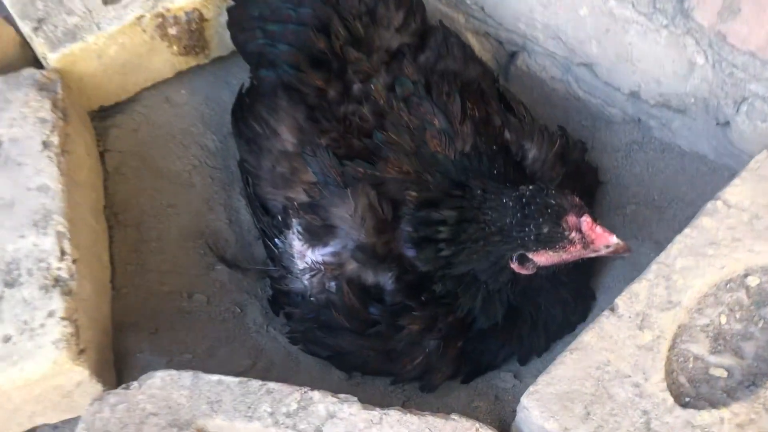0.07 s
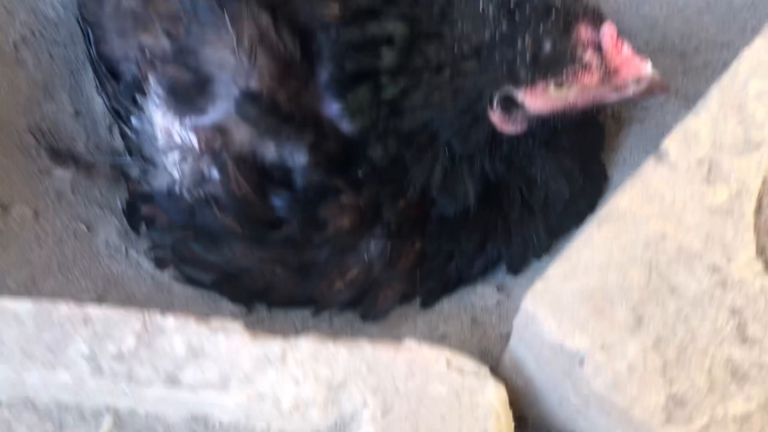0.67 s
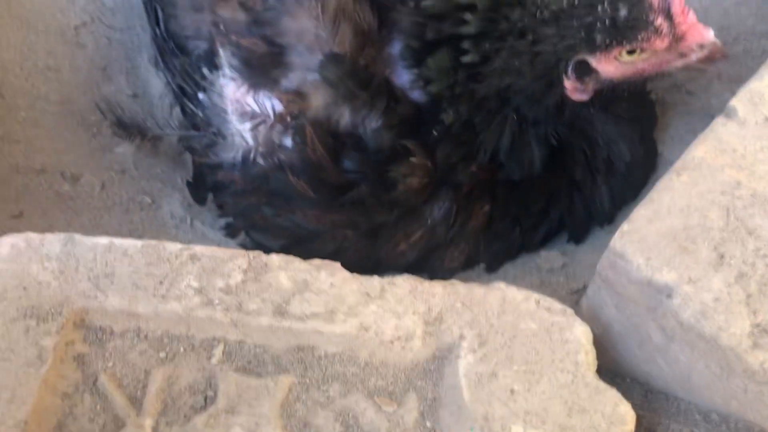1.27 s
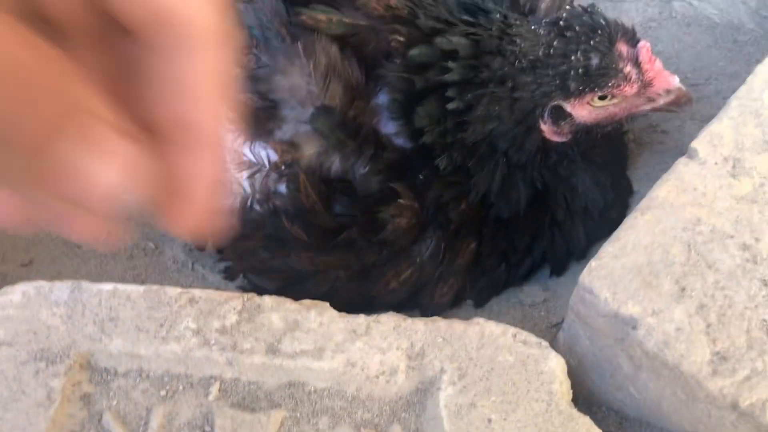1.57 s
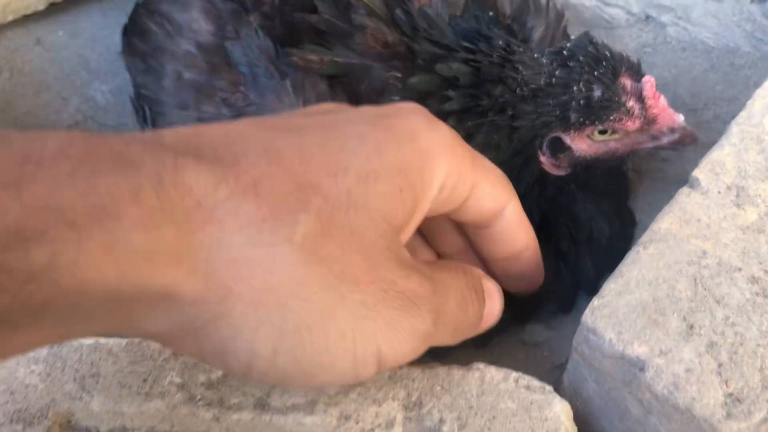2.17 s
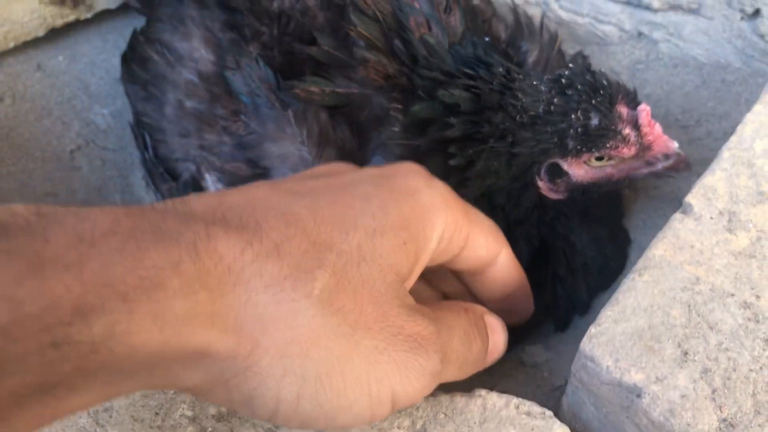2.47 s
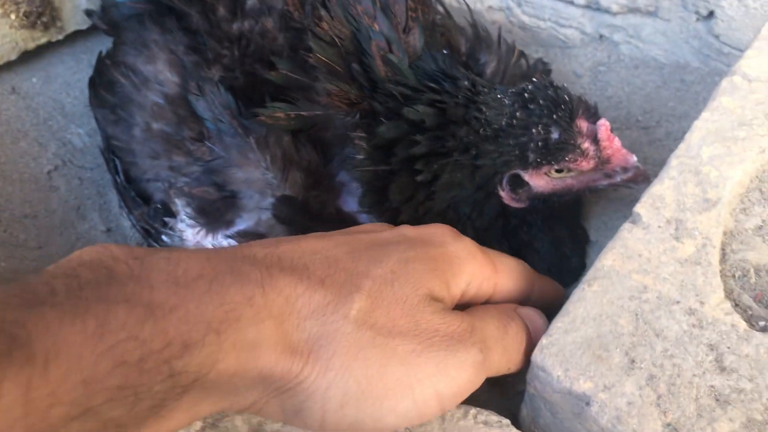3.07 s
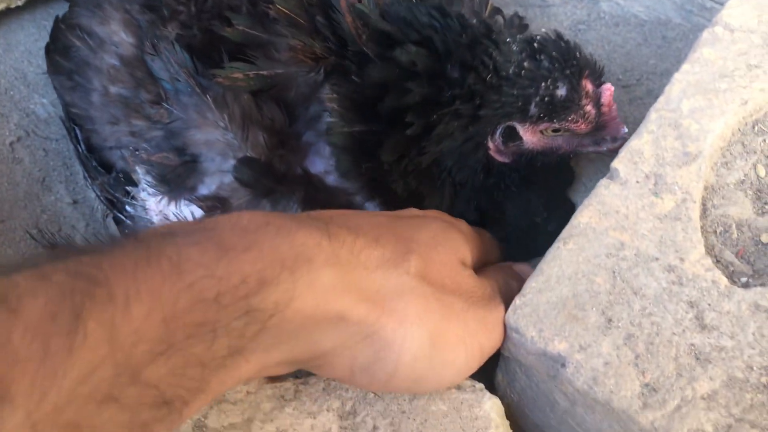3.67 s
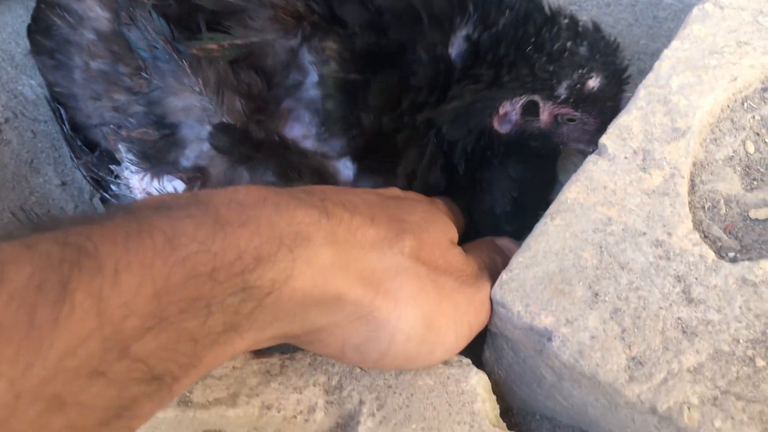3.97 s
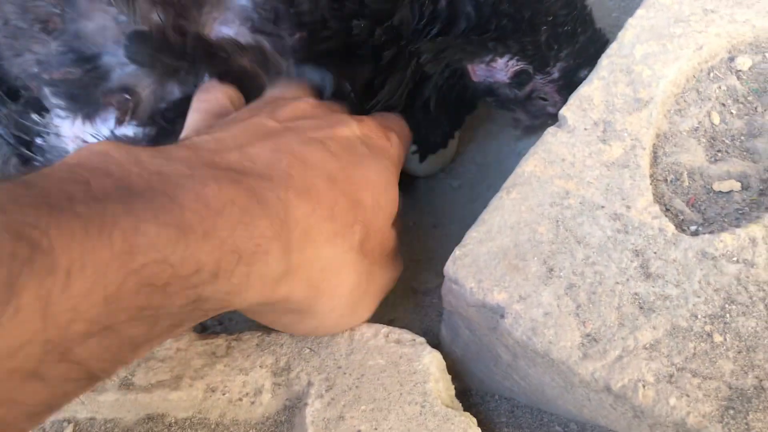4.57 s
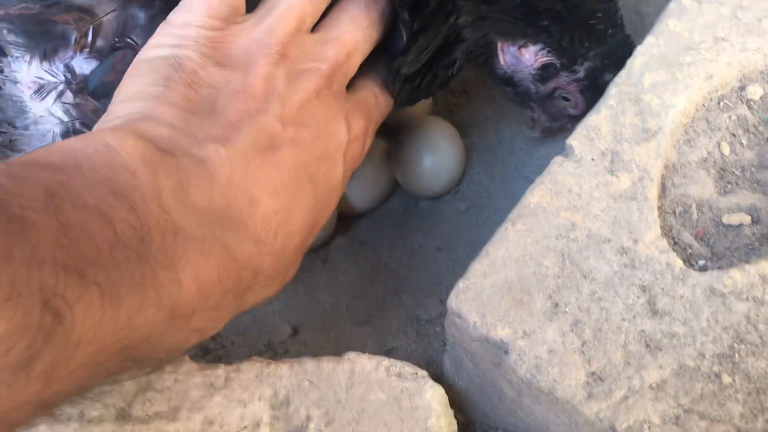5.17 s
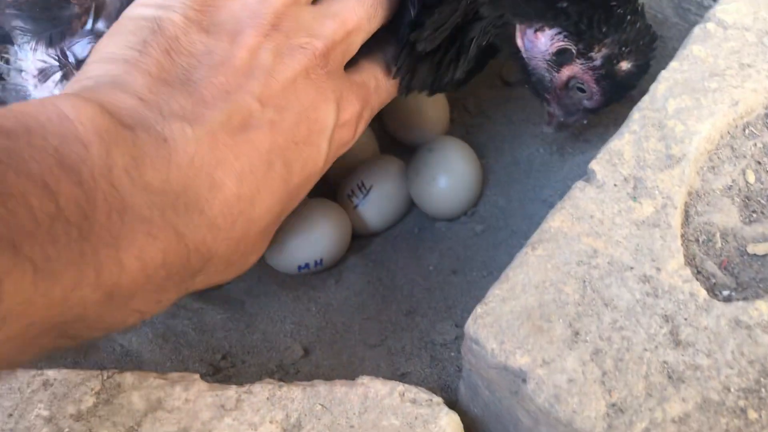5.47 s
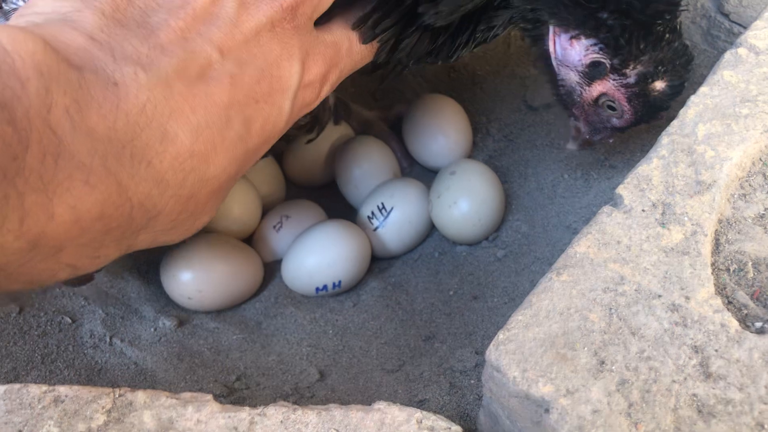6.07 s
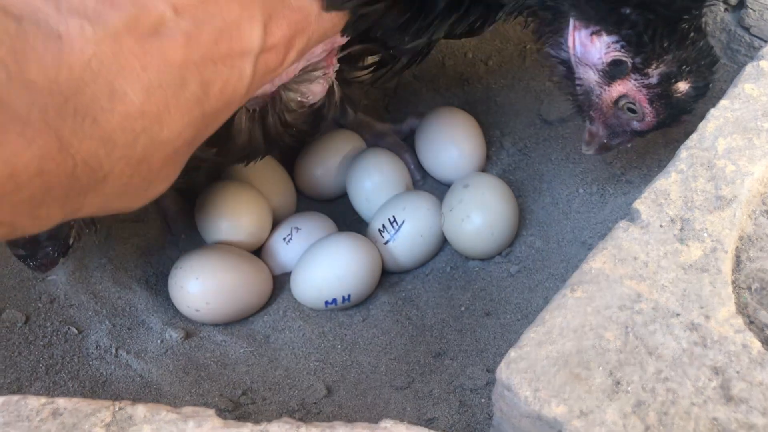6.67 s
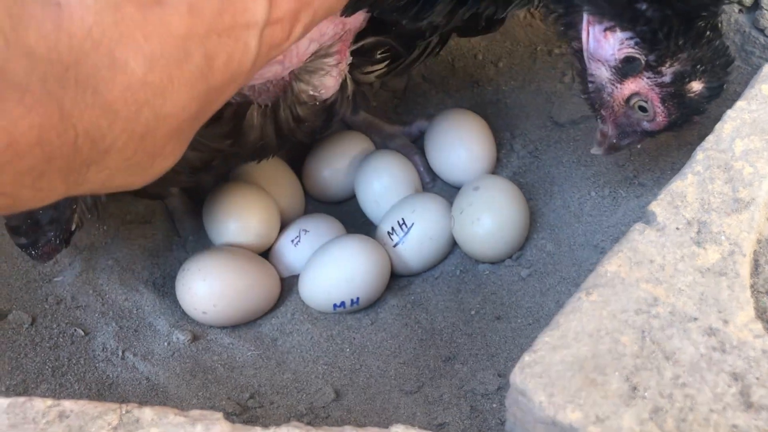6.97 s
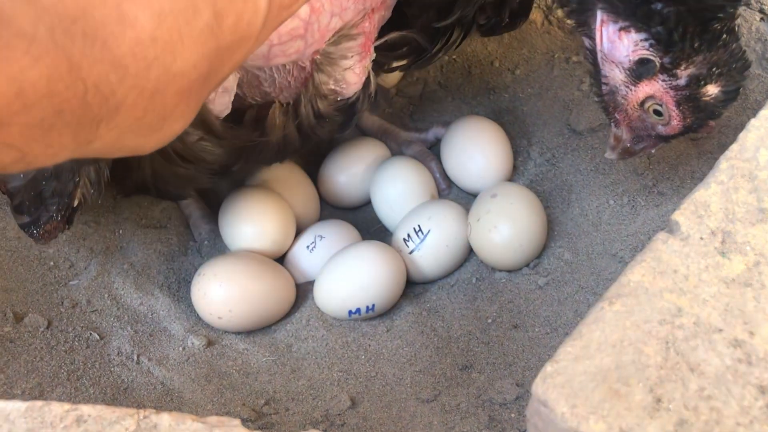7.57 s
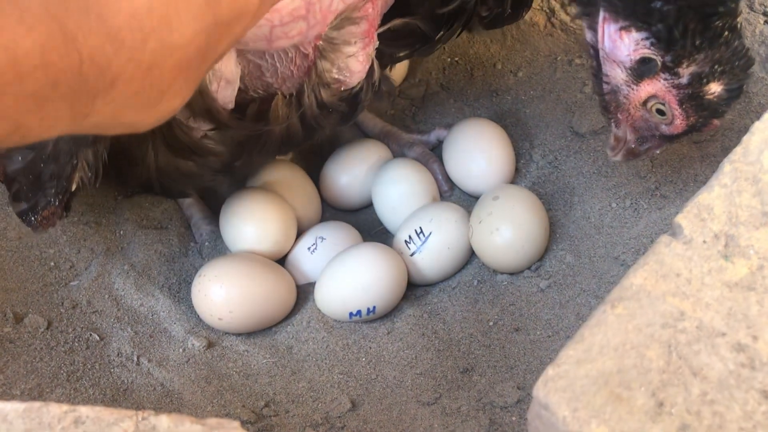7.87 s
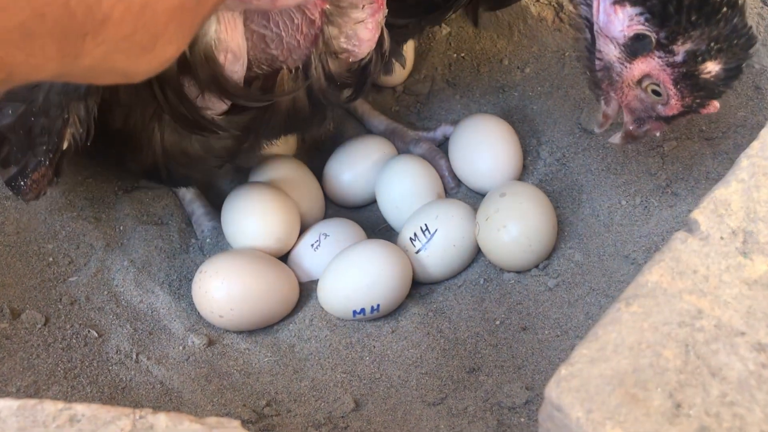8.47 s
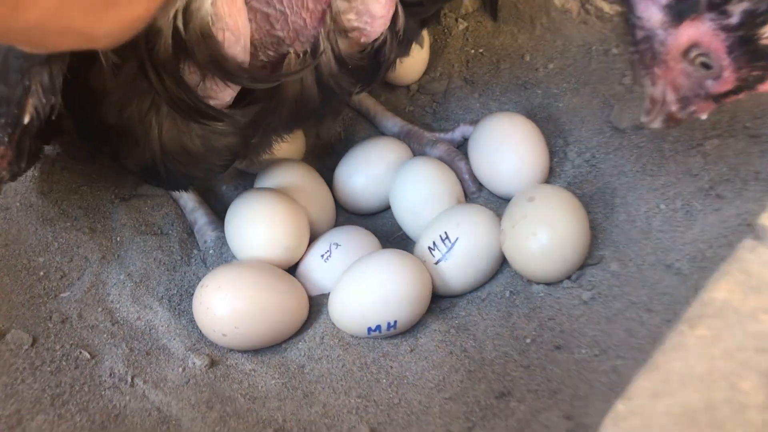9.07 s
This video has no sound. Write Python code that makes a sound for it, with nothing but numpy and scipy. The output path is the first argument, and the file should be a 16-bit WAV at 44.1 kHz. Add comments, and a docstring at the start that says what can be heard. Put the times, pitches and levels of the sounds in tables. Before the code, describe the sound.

In a brick nook outdoors, a disturbed hen clucks, squeaks and growls up close, then gives a quick series of throaty rattles. Scattered clucks and peeps follow while a hand brushes her feathers and her eggs tap softly. She finishes with a harsh, throbbing growl and more clucks. Behind her are a low yard rumble, faraway sparrows and one very faint horn.

```python
"""A broody hen scolding

In a brick nook a hand lifts a hen off her eggs. Her rattles and growls are even runs of short puffs, made
by source and filter: pulses from the syrinx ring her throat, dull with the beak shut, harsh with it open.
Some puffs break into squeaks. Feathers rustle, grit ticks, eggs knock; sparrows and a horn sound afar."""
import sys
import numpy as np
from scipy import signal
from scipy.fft import rfft, irfft
from scipy.io import wavfile
from scipy.ndimage import uniform_filter1d

SR = 44100
rng = np.random.default_rng(int(sys.argv[2]) if len(sys.argv) > 2 else 0)


def unload_wav(signal):
    """Save mono or channel-first audio to the path in sys.argv[1] as 16-bit WAV at rate SR, clipped to [-1, 1]."""
    wavfile.write(
        sys.argv[1],
        SR,
        np.round(np.clip(np.atleast_2d(signal).T, -1, 1) * 32767).astype(np.int16),
    )


N = 410571
FFT_SIZE = 4096
FREQS = np.arange(FFT_SIZE // 2 + 1) * SR / FFT_SIZE + 1

# Levels are relative within each table; beak opening runs from 0 (shut) to 1 (open).
# outdoor noise spectrum: (frequency [Hz], level [dB])
YARD_SPECTRUM = [(15, -39.5), (25, -10), (59, -1.5), (116, -3), (227, -14), (340, -22.5), (469, -20.5),
                 (782, -26), (2920, -41), (3440, -44), (5010, -57), (5580, -48.5), (15500, -61)]
# sparrow chirps: (start [s], length [s], level [dB], start pitch [Hz], middle pitch [Hz], end pitch [Hz])
CHIRPS = [(3.848, 0.045, -60, 3400, 2940, 3320), (4.152, 0.044, -64.5, 3670, 3910, 4370),
          (5.252, 0.039, -62, 2960, 3130, 3620), (5.305, 0.073, -61.5, 4350, 3880, 3540),
          (5.344, 0.083, -55, 3750, 3290, 3120), (6.821, 0.12, -61.5, 5400, 3780, 3250),
          (7.533, 0.056, -54, 3760, 3290, 3490), (7.692, 0.06, -61, 4250, 3500, 3290)]
# partials of the horn: (frequency [Hz], level [dB])
HORN_PARTIALS = [(1658, -67.5), (2040, -68), (2406, -72), (2546, -76), (2869, -69), (3817, -73.5)]
# friction spectrum of feathers: (frequency [Hz], level [dB])
FEATHER_SPECTRUM = [(880, -23.5), (1500, -1.5), (3090, -7), (3910, -3.5), (7750, -10), (13100, -4),
                    (15500, -7)]
# strokes of the hand: (peak time [s], rise [s], fall [s], level [dB])
STROKES = [(.26, 0.065, 0.14, -58), (1.1, 1, 1, -62.5), (1.65, 0.0079, 0.36, -54.5), (3.35, 0.26, 0.8, -61),
           (4.7, 0.85, .7, -66.5), (6.5, 0.29, 0.22, -57.5), (7.89, 0.034, 0.16, -57), (9.3, 0.2, .1, -54)]
# ticks of grit and quills: (time [s], level [dB])
TICKS = [(0.046, -41.5), (0.2375, -39), (0.2457, -32), (4.928, -43), (6.4377, -37.5), (9.2523, -37.5),
         (9.2792, -33.5), (9.2928, -33)]
# soft knocks of the eggs: (time [s], level [dB])
KNOCKS = [(0.463, -42.5), (5.488, -38), (6.074, -47)]
# resonances of ticks, eggs, and the hen's throat and chest: (frequency [Hz], width [Hz], level [dB])
TICK_MODES = [(2780, 6200, -1), (7400, 38000, -5.5), (14200, 8300, 1)]
EGG_MODES = [(630, 1300, 8.5), (1840, 1800, -5.5), (4000, 7600, -21)]
SHUT_MODES = [(288, 280, -8.5), (719.7, 190, 1), (989, 430, 0), (1368, 176, -11), (2544, 940, -32),
              (3963, 760, -19), (5340, 550, -28.5), (7110, 400, -33.5), (10400, 21000, -50),
              (12250, 1800, -40), (14000, 1000, -33)]
OPEN_MODES = [(343, 270, -24), (659, 125, -0.5), (1034, 330, -4), (1250, 810, -2.5), (1695, 310, -8.5),
              (2130, 150, -18.5), (2880, 1110, -18.5), (3906, 250, -30), (5540, 380, -36.5),
              (6880, 850, -48.5), (9700, 37000, -58)]
# harmonics of a squeak, from the fundamental up: (level [dB])
SQUEAK_HARMONICS = [3.5, -29.5, -40.5, -52.5]
# squeaks: (start [s], length [s], level [dB], start pitch [Hz], end pitch [Hz])
SQUEAKS = [(0.104, 0.04, -38.5, 1277, 1000), (0.213, 0.023, -38.5, 1240, 930),
           (0.626, 0.048, -40.5, 1390, 960), (0.7, 0.021, -26.5, 980, 1140),
           (1.132, 0.04, -38.5, 1255, 1600), (1.2, 0.034, -31, 1354, 1450),
           (1.259, 0.026, -23.5, 1193, 1358), (1.311, .022, -16, 1060, 1180),
           (1.413, 0.044, -44.5, 452, 476), (1.574, 0.052, -43, 433, 490),
           (1.731, 0.046, -38.5, 1470, 1670), (1.784, 0.03, -28.5, 1280, 1566),
           (1.837, 0.023, -24, 1131, 1452), (1.887, 0.016, -25, 1215, 777), (1.941, 0.0227, -24, 1235, 892),
           (2.001, .02, -26.5, 1350, 947), (3.234, 0.045, -40.5, 1514, 1240),
           (3.291, .025, -26, 1050, 1390), (3.766, 0.019, -28.5, 994, 930), (4.088, .026, -46, 1380, 770),
           (4.873, .02, -38, 1677, 1144), (4.936, 0.011, -28.5, 1700, 1530),
           (4.984, 0.02, -21.5, 1302, 1657), (5.044, 0.038, -28.5, 1100, 900), (5.099, .03, -44, 1005, 710),
           (5.162, 0.038, -51.5, 474, 440), (5.53, 0.026, -34.5, 1602, 960),
           (5.597, 0.0277, -40, 1153, 900), (8.559, 0.026, -23, 1089, 1095),
           (8.701, 0.025, -20.5, 1144, 1400)]
# nasal peeps: (start [s], length [s], level [dB])
PEEPS = [(6.388, 0.014, -35.5), (6.486, 0.014, -37.5), (6.529, 0.013, -33.5), (9.041, 0.036, -46),
         (9.072, 0.034, -48)]
# single clucks: (middle time [s], length [s], level [dB], beak [0-1], chest [dB], treble [dB])
CLUCKS = [(0.189, .034, -37, 0.44, 14, 2), (0.236, 0.019, -27.5, 0.44, -8, -9),
          (0.399, 0.024, -27, 0.29, 16.5, 11.5), (0.594, 0.0067, -32.5, 0.95, -12, 3),
          (0.672, 0.038, -27, 0.11, 9, 4.5), (.735, 0.029, -26.5, 0, 8.5, 2),
          (0.761, 0.015, -29.5, 0.13, 0, -18.5), (0.786, 0.015, -27, 0, 2.5, 4),
          (0.816, 0.0074, -33, .05, 8, 3), (1.378, 0.013, -27, 0.37, 2.5, -16),
          (1.848, 0.024, -33.5, .9, -6, 16), (1.902, .014, -24.5, 0.4, -8, 5.5),
          (3.362, .018, -25.5, 0.62, 6, -1.5), (3.774, .016, -33.5, 0.3, 5, 3.5),
          (4.043, 0.0097, -36.5, 0.35, 29, 14), (4.114, .019, -39, 0.53, 5, 0),
          (4.454, 0.017, -34, 0.78, 21.5, 14), (4.889, 0.027, -35, 0.98, -18, 5.5),
          (4.996, .018, -26, .85, 0, -7), (5.119, 0.044, -38.5, 0.38, 13, -9),
          (6.404, .028, -37.5, .95, 11.5, 4), (6.51, 0.024, -42.5, 1, 8, 0), (6.543, 0.028, -39, 1, 9.5, 5),
          (6.574, 0.011, -33.5, 0.8, 7, 0), (6.598, .023, -27, .95, 18.5, 1.5),
          (6.641, 0.0089, -31.5, .8, 11, -6), (8.714, 0.03, -24, 0.95, 3, 2.5),
          (8.773, 0.02, -25.5, .8, 8, -3), (8.794, 0.018, -27, 0.92, 17, 6),
          (8.818, .01, -29, 0.74, 5, -32), (8.979, 0.026, -34, 0.36, 17, -9),
          (9.034, 0.026, -38, .35, 14, -13), (9.254, 0.014, -22.5, 0.55, 1, -9),
          (9.299, 0.038, -28.5, 0.66, 11, 4)]
# rattles: (first puff [s], last puff [s], first level [dB], last level [dB], first beak [0-1],
# last beak [0-1], chest [dB], treble [dB], whine [dB])
RATTLES = [(1.953, 2.118, -26, -25, .55, .45, 7, -0.5, 4.5),
           (2.187, 2.377, -24, -29.5, .45, 0.12, 10.5, 0, 5),
           (2.583, 2.766, -25.5, -27.5, 0.09, 0.04, 5, 3, -2),
           (2.815, 2.918, -25.5, -27.5, .13, 0.1, 6, 5.5, 6),
           (2.981, 3.151, -27, -28, 0.18, 0.18, 9.5, 7, -7.5),
           (5.545, 5.678, -31.5, -33, .95, .4, 3, -3, 9),
           (9.11, 9.201, -35, -34.5, 0.47, 0.64, 2, 0.5, 6.5)]
# growls: (first puff [s], last puff [s], nominal puff rate [Hz], nominal throb rate [Hz],
# first level [dB], last level [dB], throb depth [dB], beak [0-1], chest [dB], treble [dB], whine [dB])
GROWLS = [(.835, 1.181, 40.4, 8.7, -25.5, -26.5, 1.5, .03, 1, 2, 7.5),
          (7.838, 8.118, 48.5, 17.7, -36, -26.5, 3, 1, 0.5, 4, -4),
          (8.149, 8.289, 47.7, 21, -30.5, -26.5, 0.5, .7, -2.5, -5, 10.5),
          (8.313, 8.674, 49, 19.3, -26, -26, 2.5, 1, -5, 5, 2.5)]


def undb(db):
    """Amplitude grows tenfold for every 20 dB."""
    return 10 ** (np.asarray(db) / 20)


def unit(x):
    """Normalisation to an rms of 1."""
    return x / np.sqrt(np.mean(x ** 2) + 1e-18)


def add(out, start, x):
    """Superposition: x adds to out from a start time in seconds."""
    i = max(int(start * SR), 0)
    out[i:i + len(x)] += x[:max(len(out) - i, 0)]


def wander(n, rate_hz):
    """A moving average smooths random steps into a fluctuation of spread near 1."""
    step = max(int(SR / rate_hz), 1)
    return 1.3 * uniform_filter1d(np.repeat(rng.standard_normal(n // step + 1), step), step)[:n]


def noise(spectrum):
    """Spectral shaping colours white noise."""
    hz, db = np.transpose(spectrum)
    freqs = np.arange(N // 2 + 1) * SR / N + 1
    gain = undb(np.interp(np.log(freqs), np.log(hz), db))
    return unit(irfft(rfft(rng.standard_normal(N)) * gain, N))


def resonances(modes):
    """Steep-sided resonances add in power to give a response in dB."""
    power = sum(undb(db) ** 2 / (1 + (2 * (FREQS - hz) / width) ** 2) ** 3 for hz, width, db in modes)
    return 10 * np.log10(power)


def ring(response_db):
    """Minimum phase: folding the cepstrum gives a causal impulse response."""
    cepstrum = irfft(np.log(undb(response_db)))
    cepstrum[1:FFT_SIZE // 2] *= 2
    cepstrum[FFT_SIZE // 2 + 1:] = 0
    return irfft(np.exp(rfft(cepstrum)))[:FFT_SIZE // 4]


def arch(n, power):
    """The envelope of blowing pressure is a slightly skewed arch."""
    return np.sin(np.pi * ((np.arange(n) + .5) / n) ** 1.1) ** power


def glide(n, start, middle, end):
    """Pitch follows a parabola through three points."""
    return np.polyval(np.polyfit([0, .5, 1], [start, middle, end], 2), np.linspace(0, 1, n))


def reverberate(x, t60, wet_db, cutoff_hz, gap_s):
    """Reverberation: scattered reflections arrive after a gap and decay exponentially."""
    t = np.arange(SR // 2) / SR
    tail = rng.standard_normal(len(t)) * undb(-60 * t / t60) * (t > gap_s)
    lowpass = signal.butter(2, cutoff_hz, fs=SR, output="sos")
    tail = signal.sosfilt(lowpass, tail) / np.sqrt(np.sum(tail ** 2))
    return x + undb(wet_db) * signal.fftconvolve(x, tail)[:N]


def yard(level_db=-48.5):
    """Ambient noise: a low rumble under a thin hiss, wavering slightly in level."""
    return noise(YARD_SPECTRUM) * undb(level_db + .45 * wander(N, 2.6))


def horn(start_s=4.25, length_s=.45, decay_s=.43):
    """Steady partials sum to one faint, fading horn note."""
    out, t = np.zeros(N), np.arange(int(length_s * SR)) / SR
    tone = sum(undb(db) * np.sqrt(2) * np.sin(2 * np.pi * hz * t) for hz, db in HORN_PARTIALS)
    add(out, start_s, tone * arch(len(t), .071) * np.exp(-t / decay_s))
    return out


def sparrows(gain_db=-1, octave_db=-23.5):
    """Frequency modulation: each chirp is a gliding, trembling whistle with a weak octave."""
    out = np.zeros(N)
    for start, length, db, *pitches in CHIRPS:
        n = int(length * SR)
        pitch = glide(n, *pitches) * (1 + .0315 * wander(n, 500))
        phase = 2 * np.pi * np.cumsum(pitch) / SR
        tone = np.sin(phase) + undb(octave_db) * np.sin(2 * phase)
        add(out, start, undb(db + gain_db) * unit(tone * arch(n, .65)))
    return out


def feathers(gain_db=2, grain_db=2.5, stir_db=-74.5):
    """Friction: barbs slide over the hand in tiny grains; each stroke swells above a constant stir."""
    t = np.arange(N) / SR
    strokes = [undb(db) * np.exp(-np.abs(t - peak) / np.where(t < peak, rise, fall))
               for peak, rise, fall, db in STROKES]
    rubbing = np.sqrt(undb(stir_db) ** 2 + np.sum(np.square(strokes), axis=0))
    grains = undb(grain_db * wander(N, 1500))
    return unit(noise(FEATHER_SPECTRUM) * grains) * undb(gain_db) * rubbing


def impacts(contacts, modes, decay_s, gain_db):
    """Impact excitation: a dying burst of noise rings the resonances of the struck body."""
    out, t = np.zeros(N), np.arange(FFT_SIZE) / SR
    for start, db in contacts:
        burst = rng.standard_normal(FFT_SIZE) * np.exp(-t / decay_s)
        hit = signal.fftconvolve(burst, ring(resonances(modes)))
        add(out, start, undb(db + gain_db) * hit / np.abs(hit).max())
    return out


def throat(beak, chest_db, treble_db, drift=.017):
    """The vocal tract is a filter: the beak sets its resonances, and neck movement shifts them a little."""
    response_db = (1 - beak) * resonances(SHUT_MODES) + beak * resonances(OPEN_MODES)
    response_db += chest_db / (1 + (FREQS / 880) ** 6)
    response_db += treble_db / (1 + (2200 / FREQS) ** 6)
    return ring(np.interp(FREQS * (1 + drift * rng.standard_normal()), FREQS, response_db))


def puff(length, beak, chest_db, treble_db, shut_hz=225, open_hz=365, scatter_db=3, spurt_s=.002):
    """Source and filter: the syrinx claps, faster and more evenly as the beak opens, ringing the throat."""
    n = int(length * SR)
    timing, strength = rng.standard_normal((24, 2)).T
    period = SR / (shut_hz + (open_hz - shut_hz) * beak ** 2)
    jitter = np.interp(beak, [0, 1], [.17, .045])
    claps = np.cumsum(period * np.exp(jitter * timing))
    claps = (claps - claps[0] + .3 * period).astype(int)
    pulses = np.zeros(n)
    pulses[claps[claps < n]] = undb(scatter_db * strength[claps < n])
    spurts = signal.lfilter([1], [1, -np.exp(-1 / (spurt_s * SR))], pulses)  # air follows each clap
    source = (pulses + .21 * spurts * rng.standard_normal(n)) * arch(n, .54)
    voice = signal.fftconvolve(source, throat(beak, chest_db, treble_db))
    return voice / np.sqrt(np.sum(voice ** 2) / n)


def whistle(length, pitches, rough, octave_db=0, flutter_hz=370, hiss_db=-26):
    """Membranes oscillate; under strain a slower flutter modulates them and brings out overtones."""
    n = int(length * SR)
    flutter = np.sin(2 * np.pi * np.cumsum(flutter_hz * (1 + .31 * wander(n, 271))) / SR)
    pitch = glide(n, *pitches) * (1 + .14 * rough * (wander(n, 682) + flutter))
    phase = 2 * np.pi * np.cumsum(pitch) / SR
    rasp_db = 20 * rough
    tone = sum(undb(db + (k > 0) * rasp_db + (k == 1) * octave_db) * np.sin((k + 1) * phase)
               for k, db in enumerate(SQUEAK_HARMONICS))
    tone *= 1 + .11 * rough * flutter
    hiss = unit(signal.fftconvolve(rng.standard_normal(n), ring(.5 * resonances(OPEN_MODES)))[:n])
    return unit((tone + undb(hiss_db + rasp_db) * hiss) * arch(n, .52))


def cluck(length, db, beak, chest_db, treble_db, whine_db, whine_span=1.3, whine_rough=.1,
          slack_hz=1380, pressed_hz=1060, release_hz=980):
    """Pressure bends pitch: within a puff the membranes also whine, falling as the pressure rises."""
    length = max(length, .005)
    out = undb(-1) * puff(length, beak, chest_db, treble_db)
    # a chesty puff lowers the whine, and a shut beak muffles it
    detune = np.exp(rng.normal(0, [.1, .03, .1]) - .0099 * max(chest_db, 0))
    pitches = np.array([slack_hz, pressed_hz, release_hz]) * detune
    add(out, 0, undb(whine_db - 12 * (2 - beak)) * whistle(whine_span * length, pitches, whine_rough))
    return undb(db) * out


def squeaks(pure_hz=1050, rough_per_octave=.59):
    """Roughness grows with pitch: low squeaks are pure, high ones hoarse."""
    for start, length, db, start_hz, end_hz in SQUEAKS:
        middle_hz = 1.011 * (start_hz + end_hz) / 2
        rough = np.clip(rough_per_octave * np.log2(middle_hz / pure_hz), 0, .6)
        yield start, undb(db) * whistle(length, (start_hz, middle_hz, end_hz), rough)


def peeps(edge_hz=934.5, crest_hz=1050):
    """A strong second harmonic makes an arching whistle nasal."""
    for start, length, db in PEEPS:
        yield start, undb(db) * whistle(length, (edge_hz, crest_hz, edge_hz), rough=.39, octave_db=22)


def single_clucks():
    """Isolated puffs are heard as separate transients."""
    for middle, length, *voice in CLUCKS:
        yield middle - length / 2, cluck(length, *voice, whine_db=-4)


def rattles(rate_hz=17, puff_s=.024, trail_s=.015, lag_s=.017):
    """A slow pulse train: each puff trails a weaker, chestier one, which fades as the beak opens."""
    for first, last, first_db, last_db, first_beak, last_beak, chest_db, treble_db, whine_db in RATTLES:
        count = round((last - first) * rate_hz) + 1
        puffs = np.linspace([first, first_db, first_beak], [last, last_db, last_beak], count)
        for middle, db, beak in puffs:
            yield middle - puff_s / 2, cluck(puff_s, db, beak, chest_db, treble_db, whine_db)
            trail = cluck(trail_s, db - 5 - 5.5 * beak, beak, chest_db + 7.5, treble_db, whine_db)
            yield middle + lag_s - trail_s / 2, trail


def growls(duty=.68, stretch_per_db=.1352):
    """Amplitude modulation: the airflow flutters into puffs; a slower throb swells and lengthens them."""
    for first, last, puff_hz, throb_hz, first_db, last_db, depth_db, *voice in GROWLS:
        count = round((last - first) * puff_hz) + 1
        throbs = round((last - first) * throb_hz)
        for middle, db, cycle in np.linspace([first, first_db, 0], [last, last_db, throbs], count):
            throb_db = depth_db * np.cos(2 * np.pi * cycle)
            length = duty / puff_hz * np.exp(stretch_per_db * throb_db)
            # the whine outlasts the claps and climbs back after every puff
            sound = cluck(length, db + throb_db, *voice, whine_span=1.42, whine_rough=.2, release_hz=1360)
            yield middle - length / 2, sound


def hen():
    """All her calls superpose into one voice."""
    out = np.zeros(N)
    for start, sound in [*rattles(), *growls(), *single_clucks(), *squeaks(), *peeps()]:
        add(out, start, sound)
    return out


def scene():
    """Reflection: the bricks answer near sounds at once, the yard later; its walls blur the far ones."""
    near = hen() + feathers()
    near += impacts(TICKS, TICK_MODES, decay_s=.0053, gain_db=7.5)
    near += impacts(KNOCKS, EGG_MODES, decay_s=.0026, gain_db=9)
    near = reverberate(near, t60=.09, wet_db=-15, cutoff_hz=5000, gap_s=.003)
    near = reverberate(near, t60=.1015, wet_db=-24.5, cutoff_hz=3000, gap_s=.056)
    far = reverberate(sparrows() + horn(), t60=.17, wet_db=-3.5, cutoff_hz=8000, gap_s=.0072)
    return (near + far + yard())[None]


def record(dry, drive=1.5, cutoff_hz=15400):
    """Soft saturation rounds the loudest peaks, and a steep low-pass cuts the top."""
    lowpass = signal.ellip(10, .2, 80, cutoff_hz, fs=SR, output="sos")
    return signal.sosfilt(lowpass, np.tanh(drive * dry) / drive)


dry = scene()
out = record(dry)
unload_wav(out)
```